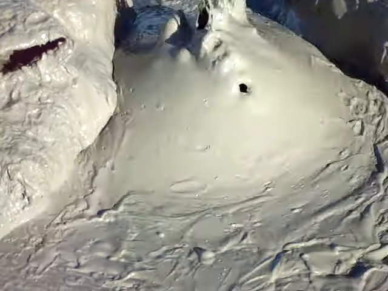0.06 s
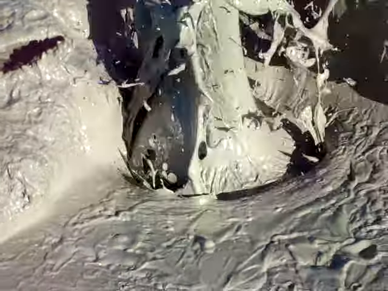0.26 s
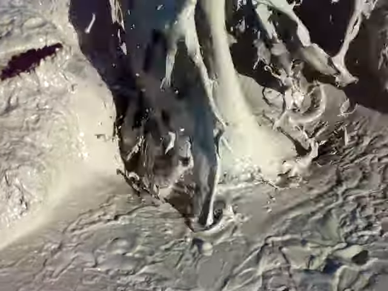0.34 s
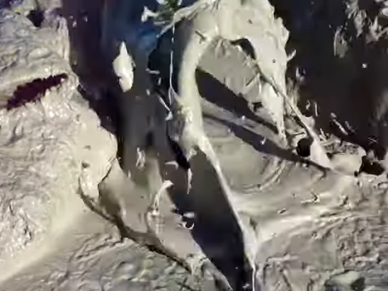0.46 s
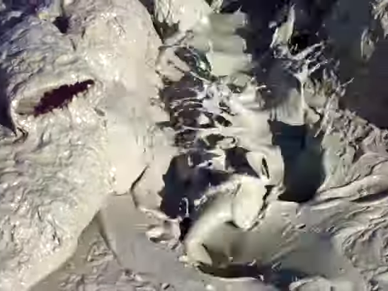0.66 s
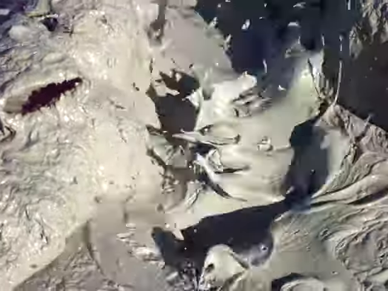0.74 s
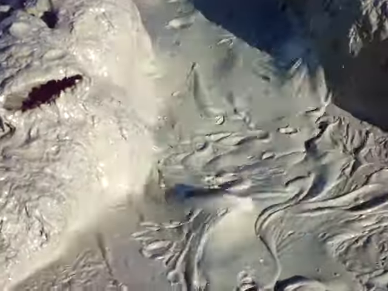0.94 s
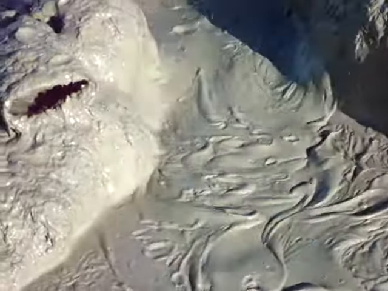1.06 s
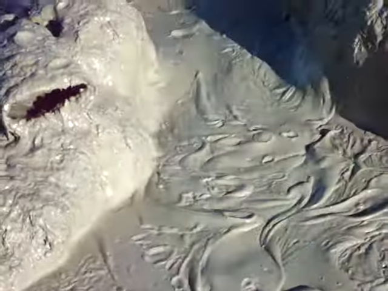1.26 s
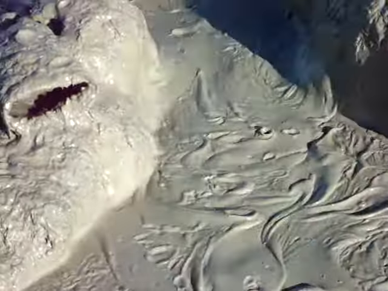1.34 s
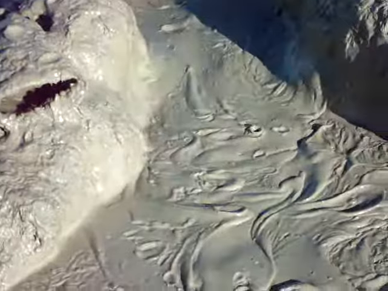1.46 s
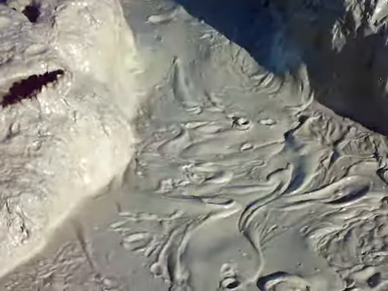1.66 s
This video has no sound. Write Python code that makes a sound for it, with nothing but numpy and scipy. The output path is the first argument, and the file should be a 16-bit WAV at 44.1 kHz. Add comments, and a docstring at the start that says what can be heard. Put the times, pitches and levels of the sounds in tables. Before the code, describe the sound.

Close outdoor mono sound of a mud bubble popping: faint fizz, abrupt throaty gulp, scattered wet plops and fine spatter, a thick splattering slap, a few last drops, then soft low blubs, light wind and a faraway bird.

```python
"""A large gas bubble bursts through thick mud in a small open crater: its cavity gulps with a rising note.
The skin leaks, fizzes and tears in grains of noise; damped air pockets with spray ring in the burst,
as clots patter down and as the thrown sheet slaps back among fine spatter.
The pool blubs in soft low cycles.
A small bird whistles far away and wind nudges the microphone: gliding sines and filtered noise.
"""
import sys
import numpy as np
from scipy import signal
from scipy.fft import rfft, irfft
from scipy.io import wavfile
from scipy.ndimage import uniform_filter1d

SR = 44100
rng = np.random.default_rng(int(sys.argv[2]) if len(sys.argv) > 2 else 0)


def store_wav(level_fs):
    """Save 16-bit WAV to argv[1]."""
    pcm = np.round(np.clip(np.atleast_2d(level_fs), -1, 1) * 32767)
    wavfile.write(sys.argv[1], SR, pcm.T.astype(np.int16))


N = 74970

# spectrum of droplets, gas leak and spatter: freq_hz, relative_db
SPRAY_COLOUR = [(100, 6.5), (600, 8.5), (1600, 11), (2200, 7), (4000, 4.5), (6500, -1), (10000, -6.5)]

GRAIN_DECAY_CYCLES, GRAINS_PER_S, GRAIN_SPREAD_DB = 2.04, 11000, 5.5


def amp(db):
    """Decibels to gain."""
    return 10 ** (np.asarray(db) / 20)


def unit(x):
    """Scales to rms 1."""
    return x / np.sqrt(np.mean(x ** 2) + 1e-20)


def level(points):
    """Gain over time from (s, dB) points, at -120 dB outside them."""
    s, db = np.transpose(points)
    return amp(np.interp(np.arange(N) / SR, s, db, left=-120, right=-120))


def add(mix, start_s, sound):
    """Mixes a sound in at start_s, cut off at the end of the mix."""
    part = mix[max(round(start_s * SR), 0):][:len(sound)]
    part += sound[:len(part)]


def highpass(x, cutoff_hz):
    """Second-order Butterworth high-pass."""
    return signal.lfilter(*signal.butter(2, cutoff_hz, "high", fs=SR), x)


def colour(x, points):
    """Gives x the spectrum (Hz, dB) with a causal minimum-phase filter of energy 1."""
    hz, db = np.transpose(points)
    f = abs(np.fft.fftfreq(4096, 1 / SR))
    log_gain = np.log(amp(np.interp(np.log(f + 1), np.log(hz), db)))
    response = np.exp(np.conj(signal.hilbert(log_gain)))
    taps = np.fft.ifft(response).real[:len(f) // 2]
    return signal.fftconvolve(x, taps / np.linalg.norm(taps))[:N]


def drift(hz):
    """Smooth random curve of rms 1, with a Gaussian roll-off at hz."""
    rolloff = np.exp(-(np.fft.rfftfreq(N, 1 / SR) / hz) ** 2)
    return unit(irfft(rfft(rng.standard_normal(N)) * rolloff, N))


def grains(per_s, decay_cycles=GRAIN_DECAY_CYCLES):
    """Tiny air pockets of many sizes snap at random moments, most faint and a few loud."""
    out = np.zeros(N)
    pitches_hz = np.geomspace(250, 10000, num=20)
    share = np.sqrt(pitches_hz) / np.sqrt(pitches_hz).sum()
    for hz, part in zip(pitches_hz, share):
        size = amp(GRAIN_SPREAD_DB * np.minimum(rng.exponential(1, N), 4))
        happens = rng.random(N) < part * per_s / SR
        snaps = size * rng.choice([-1, 1], N) * happens
        turns = np.arange(SR // 40) * hz / SR
        ring = np.exp(-turns / decay_cycles) * np.sin(2 * np.pi * turns)
        out += np.sqrt(hz) * unit(signal.oaconvolve(snaps, ring)[:N])
    return unit(out)


def echo(x, t60_s, wet_db):
    """Adds a scattered tail thrown back by the surroundings: decaying noise of energy 1."""
    t = np.arange(SR // 2) / SR
    tail = rng.standard_normal(len(t)) * amp(-60 * t / t60_s)
    return x + amp(wet_db) * signal.fftconvolve(x, tail / np.linalg.norm(tail))[:N]


def cavity():
    """Gas rings as the hole widens, choked when mud flaps across it; overtones leave by the mouth."""
    # opening cavity: time_s, pitch_hz, fundamental_db
    ring_points = [(0.201, 177.6, -26.5), (0.21, 181.6, -23), (0.216, 269.3, -2.5), (0.22, 282.5, -8),
                   (0.231, 223.4, -9), (0.238, 199, -17), (0.245, 322, -4.5), (0.248, 349, -25.5),
                   (0.257, 381, -6.5), (0.266, 351, -10.5), (0.268, 390, -12), (0.274, 390, -46)]
    steepen, pointed = 0.42, 0.6  # loud cycles lean forward and sharpen
    flutter, flutter_hz = 0.025, 300  # uneven flapping of the rim: rms pitch ratio, rate limit
    mouth_hz, mouth_width_hz, mouth_db = 817, 75, 13  # resonance of the torn opening

    s, hz, db = np.transpose(ring_points)
    t = np.arange(N) / SR
    pitch_hz = np.interp(t, s, hz) * (1 + flutter * drift(flutter_hz))
    swing = level(np.c_[s, db])
    force = swing / swing.max()
    phase = 2 * np.pi * np.cumsum(pitch_hz * (np.arange(N) > s[0] * SR)) / SR
    lean = steepen * force * np.sin(phase)
    wave = np.sin(phase + steepen * force * np.sin(phase + lean))
    sharpened = wave * abs(wave) ** (pointed * force)
    buzz = highpass(swing * sharpened, mouth_hz)
    mouth = signal.lfilter(*signal.iirpeak(mouth_hz, mouth_hz / mouth_width_hz, fs=SR), buzz)
    return swing * np.sin(phase) + buzz + amp(mouth_db) * mouth


def pushes():
    """Low pushes of air: single swings of pressure that do not ring."""
    # centre_s, half_length_s, peak_db
    push_table = [(0.229, .009, -45), (.235, 0.0032, -28), (1.546, 0.0013, -19), (1.604, 0.0031, -28)]
    out = np.zeros(N)
    for centre_s, half_s, db in push_table:
        u = (np.arange(N) / SR - centre_s) / half_s
        out += amp(db) * (1 - 2 * u ** 2) * np.exp(-u ** 2)
    return out


def leak():
    """Gas hisses through the first pinholes."""
    # time_s, level_db
    leak_points = [(.13, -86), (.165, -40), (.187, -39.5), (.2, -35), (.21, -40.5)]
    return colour(level(leak_points) * grains(GRAINS_PER_S), SPRAY_COLOUR)


def tear():
    """The skin fizzes and tears: dense grains under a jagged level curve."""
    # time_s, level_db
    tear_points = [(.11, -52), (.123, -41), (.185, -44.5), (.205, -50), (.218, -19.5), (.232, -28),
                   (.243, -22), (.251, -34.5), (.259, -24.5), (.274, -40.5), (.29, -40), (.36, -44.5)]
    # freq_hz, relative_db
    tear_colour = [(100, -4), (380, 8), (850, 1), (1600, -1), (2200, -6.5), (3200, -5.5), (5000, -19),
                   (10000, -36)]
    return colour(level(tear_points) * grains(GRAINS_PER_S), tear_colour)


def pockets():
    """Heavily damped air pockets ring, each with a brief spray in uneven clumps."""
    # air pockets ringing in the burst, the landing clots and the slap:
    # start_s, pocket_hz, cycles_to_peak, ring_db, spray_db
    pocket_table = [(0.2362, 1700, 2.2, -15.5, -27.5), (0.239, 1042, 3.3, -20, -32),
                    (.267, 1280, 1.5, -18, -47), (0.271, 1590, 2.3, -21, -34.5),
                    (0.2947, 1580, 2.6, -16.5, -34.5), (0.2968, 1060, 1.07, -16, -52),
                    (0.3218, 1690, 0.39, -14, -22.5), (0.3237, 497, 1.24, -15, -61),
                    (0.324, 1816, 3.9, -19, -30.5), (.3255, 788, 1.46, -17.5, -54),
                    (.325, 374, 1.5, -22.5, -54), (0.3695, 1650, 2.9, -38, -34),
                    (0.379, 3880, 1.7, -31, -37.5), (0.3881, 917, 1.5, -17, -40),
                    (0.412, 1750, 1.08, -12.5, -30.5), (.4158, 854, 0.64, -10, -30),
                    (0.4386, 1575, 2.5, -26, -60), (0.4566, 4440, 13, -31, -26.5),
                    (0.482, 3050, 10.4, -35, -36), (0.5027, 3900, 1.9, -25, -34.5),
                    (0.5182, 3050, 1.2, -27, -38), (0.5474, 2880, 2.7, -27, -37.5),
                    (0.5516, 4180, 6.6, -17, -26), (0.574, 1370, 1.1, -24.5, -29.5),
                    (0.6036, 860, 0.65, -22, -37), (0.6417, 955, 0.81, -27.5, -44),
                    (0.647, 1730, 2.2, -30.5, -38), (0.6928, 1795, 3.1, -26, -33),
                    (0.7002, 1166, 1.6, -22, -40), (0.699, 1770, 3.2, -24.5, -36),
                    (0.7001, 492, 1.6, -22.5, -31.5), (0.71, 1790, 6.1, -24.5, -29),
                    (0.717, 380, 1.7, -24, -28), (.7405, 689, 1.2, -12.5, -29),
                    (0.7418, 865, 1.14, -14, -24.5), (0.744, 1596, 2.6, -30, -23),
                    (0.7636, 1700, 3.2, -16.5, -22), (0.768, 950, 1.7, -23, -45),
                    (0.773, 1460, 6.5, -20.5, -21), (0.7785, 1720, 1.7, -15.5, -20),
                    (0.7933, 2994, 4.4, -18.5, -26.5), (0.7951, 1660, 2.4, -19, -28.5),
                    (0.856, 1030, 0.86, -24, -29.5), (0.8701, 4580, 3.8, -19, -28),
                    (0.8852, 1250, 0.55, -17.5, -59), (0.8925, 1020, 0.64, -12, -35),
                    (0.9304, 1570, 0.79, -22.5, -35.5), (0.9419, 900, 1.7, -29, -35),
                    (0.973, 2010, 1.1, -52, -42)]
    pocket_rise = 0.022  # pitch gain per time to peak
    pocket_wobble, wobble_hz = 0.087, 990  # soft mud quivers
    pocket_low_hz = 226  # small pockets radiate little below this
    spray_rise_s, spray_lead_s = 0.0029, 0.0018  # spray starts just before its pocket rings
    trail_db, trail_s = -17.5, 0.003  # droplets that follow each pocket
    spray_above, spray_db_per_octave = 4.46, 5  # centre / pocket pitch, so big pockets sound dull
    spray_clump_db = 4

    rings, spray = np.zeros(N), np.zeros(N)
    t = np.arange(SR // 20) / SR
    f = np.fft.rfftfreq(len(t), 1 / SR)
    puff = (t / spray_rise_s * np.exp(1 - t / spray_rise_s)) ** 3
    puff += amp(trail_db) * t / trail_s * np.exp(1 - t / trail_s)
    wobble = 1 + pocket_wobble * drift(wobble_hz)
    droplets = grains(GRAINS_PER_S) * amp(spray_clump_db * drift(wobble_hz))
    for start_s, hz, cycles, ring_db, spray_db in pocket_table:
        first = round(start_s * SR)
        now = slice(first, first + len(t))

        u = t * hz / cycles  # time in units of the time to peak
        pitch_hz = hz * (1 + pocket_rise * (np.minimum(u, 6) - 1)) * wobble[now]
        turns = np.cumsum(pitch_hz) / SR
        add(rings, start_s, amp(ring_db) * u * np.exp(1 - u) * np.sin(2 * np.pi * turns))

        octaves_off = abs(np.log2((f + 1) / (spray_above * hz)))
        tint = amp(-spray_db_per_octave * octaves_off)
        burst = puff * irfft(tint * rfft(droplets[now]), len(t))
        burst *= np.linalg.norm(puff) / np.linalg.norm(burst)
        add(spray, start_s - spray_lead_s, amp(spray_db) * burst)
    return highpass(rings, pocket_low_hz) + colour(spray, SPRAY_COLOUR)


def slap():
    """The thrown sheet of mud slaps down: dense grains in uneven bursts."""
    # time_s, level_db
    slap_points = [(.68, -56), (.702, -32.5), (.72, -39.5), (.729, -50.5), (.739, -21), (.747, -20),
                   (.757, -26.5), (.767, -26.5), (.781, -32.5), (.79, -38), (.798, -36.5), (.805, -24),
                   (.812, -70)]
    # freq_hz, relative_db
    slap_colour = [(110, -6), (300, 5.5), (500, -1.5), (900, -3), (1200, -6), (1650, 9), (2200, -7),
                   (2800, 6), (3400, -9), (3900, 1.5), (6200, -9), (10000, -14.5)]
    return colour(level(slap_points) * grains(GRAINS_PER_S), slap_colour)


def spatter():
    """Fine spatter between the clots, with stray droplets that are fewer and ring longer."""
    # time_s, level_db of the fine grains
    spatter_points = [(.28, -75), (.43, -65), (.48, -52.5), (.55, -50.5), (.62, -50.5), (.68, -52.5),
                      (.83, -59), (.87, -57.5), (1.02, -59), (1.09, -59), (1.7, -70)]
    fine_per_s = 6100
    strays_per_s, stray_decay_cycles, stray_db = 1800, 6, 2  # stray_db is relative to the fine grains
    fine = grains(fine_per_s)
    strays = amp(stray_db) * grains(strays_per_s, stray_decay_cycles)
    return colour(level(spatter_points) * (fine + strays), SPRAY_COLOUR)


def blubs():
    """Gas shifting under the mud around the crater: a few soft low cycles each."""
    # centre_s, pitch_hz, level_db
    blub_table = [(0.01, 211, -37), (0.658, 157, -37), (0.918, 200, -30), (1.027, 152, -35.5),
                  (1.058, 164, -30), (1.327, 155, -32)]
    half_length_s = 0.012  # Gaussian envelope falls to 1/e here
    out = np.zeros(N)
    for centre_s, hz, db in blub_table:
        t = np.arange(N) / SR - centre_s
        out += amp(db) * np.exp(-(t / half_length_s) ** 2) * np.sin(2 * np.pi * hz * t)
    return out


def bird():
    """Thin curving whistles from far away: sines on quadratic glides with a slight waver."""
    # start_s, length_s, first_hz, middle_hz, last_hz, level_db
    note_table = [(0.895, 0.045, 4600, 4750, 5430, -51), (1.108, 0.039, 3200, 3284, 3630, -46),
                  (1.149, 0.033, 3850, 4250, 4470, -49.5), (1.211, 0.048, 3200, 3385, 3700, -45.5),
                  (1.275, 0.029, 3850, 4180, 4200, -49), (1.291, 0.059, 6350, 5780, 5860, -52),
                  (1.335, 0.043, 7200, 7140, 7540, -56), (1.358, 0.11, 2090, 2047, 2055, -52.5),
                  (1.41, 0.024, 4200, 4230, 4200, -56), (1.448, 0.028, 3550, 3110, 2850, -57),
                  (1.468, 0.059, 2860, 2790, 2840, -44)]
    waver_ratio, waver_hz = 0.0066, 120
    out = np.zeros(N)
    waver = 1 + waver_ratio * drift(waver_hz)
    for start_s, length_s, first_hz, middle_hz, last_hz, db in note_table:
        u = np.arange(0, length_s, 1 / SR) / length_s
        curve = np.polyfit([0, 0.5, 1], [first_hz, middle_hz, last_hz], 2)
        pitch_hz = np.polyval(curve, u) * waver[round(start_s * SR):][:len(u)]
        phase = 2 * np.pi * np.cumsum(pitch_hz) / SR
        add(out, start_s, amp(db) * np.sin(np.pi * u) * np.sin(phase))
    return out


def wind():
    """Wind on the microphone: low buffeting in short gusts over a faint steady hiss."""
    # gusts: time_s, level_db
    gust_points = [(0, -44.5), (.06, -41.5), (.1, -54.5), (.19, -48), (.45, -49), (.52, -46), (.85, -49.5),
                   (.91, -32), (.97, -39.5), (1.03, -34.5), (1.09, -39.5), (1.29, -45.5), (1.325, -40),
                   (1.36, -48), (1.44, -51.5), (1.495, -36.5), (1.6, -45), (1.7, -51)]
    # buffeting spectrum: freq_hz, relative_db
    buffet_colour = [(20, -29), (50, -15), (80, -4.5), (160, -1), (280, -0.5), (450, -13.5), (900, -35),
                     (2500, -30), (10000, -90)]
    # hiss spectrum: freq_hz, relative_db
    hiss_colour = [(30, -9.5), (250, 4.5), (700, 3), (1500, -6), (3000, -8), (6000, -16), (10000, -21.5)]
    hiss_db = -49
    buffet = colour(rng.standard_normal(N), buffet_colour)
    # even out the noise so that the gust curve sets its level
    buffet /= np.sqrt(uniform_filter1d(buffet ** 2, size=1500) + 1e-9)
    hiss = colour(rng.standard_normal(N), hiss_colour)
    return level(gust_points) * buffet + amp(hiss_db) * hiss


def scene():
    """The mud in its crater, with bird and wind around it."""
    splashes = leak() + tear() + pockets() + slap() + spatter()
    mud = cavity() + pushes() + echo(splashes, t60_s=0.05, wet_db=-18) + blubs()
    # the ground around scatters the calls
    calls = echo(bird(), t60_s=0.18, wet_db=-3.5)
    return (mud + calls + wind())[None]


def record(dry):
    """The loudest peaks round off softly, then a low-pass limits the band."""
    overload, edge_hz = 0.72, 10200
    limited = dry / (1 + (dry / overload) ** 8) ** (1 / 8)
    lowpass = signal.firwin(511, edge_hz, window=("kaiser", 9), fs=SR)
    return signal.oaconvolve(limited, lowpass[None], "same")


dry = scene()
out = record(dry)
store_wav(out)
```